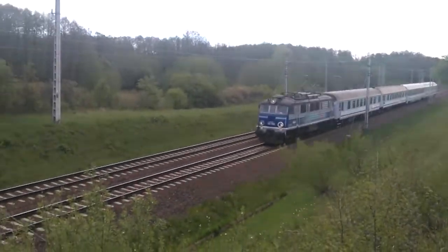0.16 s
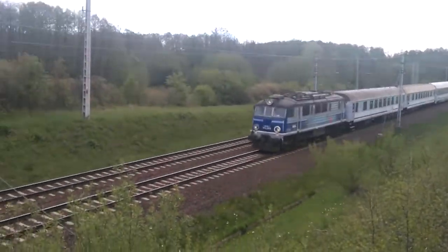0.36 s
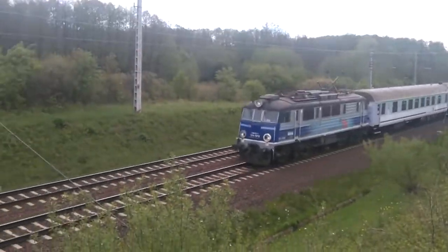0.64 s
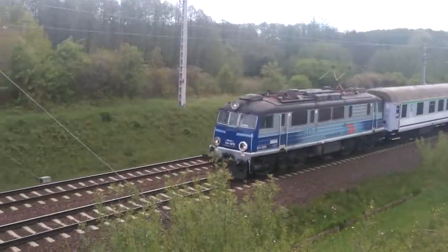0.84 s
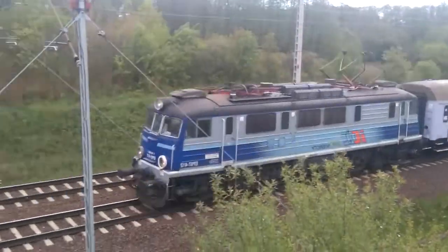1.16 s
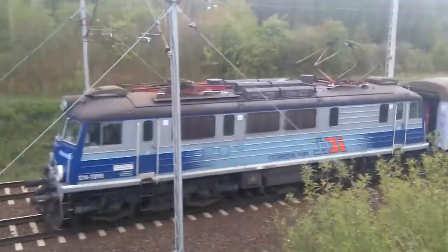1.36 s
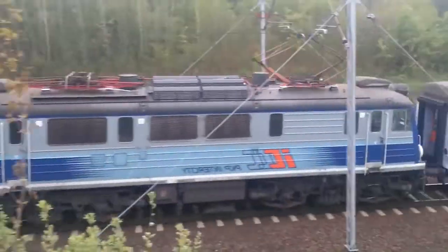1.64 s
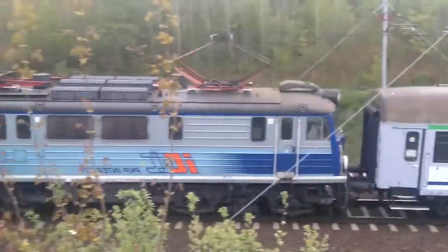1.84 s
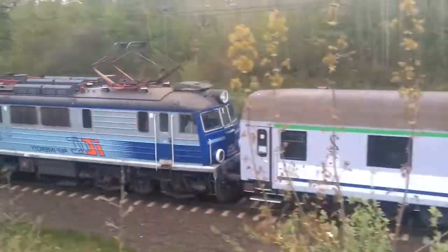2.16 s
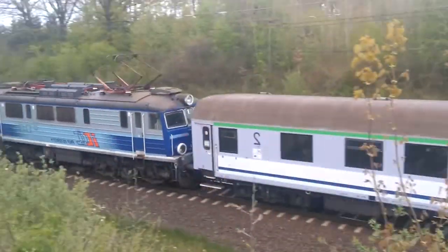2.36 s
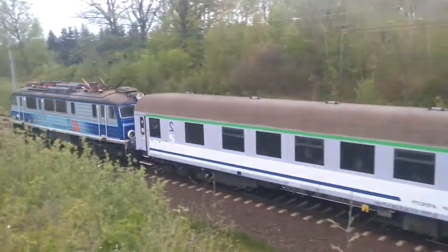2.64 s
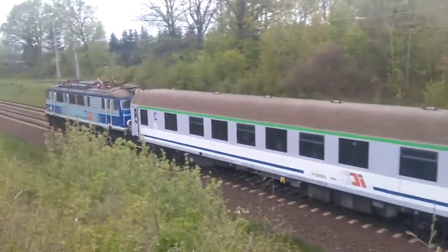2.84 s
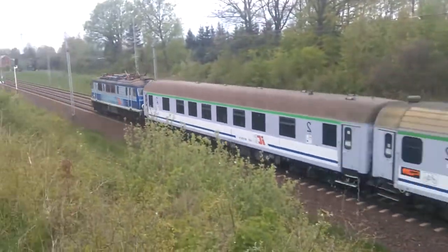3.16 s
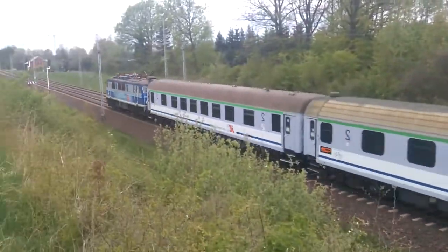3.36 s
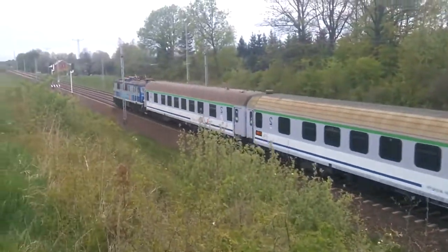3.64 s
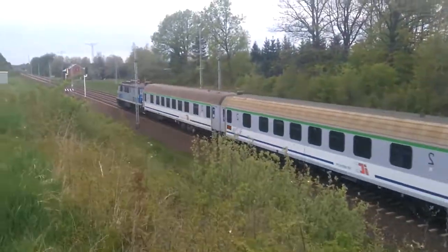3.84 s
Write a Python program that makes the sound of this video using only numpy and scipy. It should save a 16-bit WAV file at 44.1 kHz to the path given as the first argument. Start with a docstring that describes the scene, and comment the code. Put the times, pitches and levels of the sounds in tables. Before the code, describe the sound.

Electric locomotive and coaches roll past a few metres away with rushing, ringing wheel-on-rail roar.

```python
"""Electric train rolling past

An electric locomotive and its first coaches pass a few metres away. Rough wheels on rough rails shake both:
shaped noise, dull from ahead, broad beside the locomotive, then mixed with a sinking wheel ring over the coaches.
Gliding noise-fed resonances make wheels, rail, blowers, drone and gear moan; two flickering noise bands
make the hiss of wheels and air, low noise the ground rumble."""
import sys
import numpy as np
from scipy import signal
from scipy.fft import rfft, irfft, next_fast_len
from scipy.io import wavfile
from scipy.ndimage import uniform_filter1d, map_coordinates

SR = 44100
rng = np.random.default_rng(int(sys.argv[2]) if len(sys.argv) > 2 else 0)


def master(y):
    """Save y as 16-bit WAV."""
    cut = np.clip(np.atleast_2d(y).T, -1, 1)
    pcm = np.round(cut * 32767)  # scale
    wavfile.write(sys.argv[1], SR, pcm.astype(np.int16))


N = 176400


def amp(db):
    """Amplitude gain of a level in dB."""
    return 10 ** (np.asarray(db) / 20)


def unit(x):
    """Scale to rms 1."""
    return x / np.sqrt(np.mean(x ** 2) + 1e-20)


def curves(rows):
    """Interpolate each column after the time to one value per sample."""
    knots_s, *columns = np.transpose(rows)
    t = np.arange(N) / SR
    return [np.interp(t, knots_s, column) for column in columns]


def wobble(rate_hz):
    """Smooth random curve with rate_hz knots a second."""
    knots = rng.standard_normal(int(N * rate_hz / SR) + 4)
    return map_coordinates(knots, [np.arange(N) * rate_hz / SR])


def filtered(x, response):
    """Zero-phase filter: multiply the spectrum by response(Hz)."""
    m = next_fast_len(N + 8192)
    spectrum = rfft(x, m) * response(np.fft.rfftfreq(m, 1 / SR))
    return irfft(spectrum, m)[..., :N]


def rush(spectrum, patchy_db):
    """Coloured noise of rms 1; smoothed random gains in time and frequency make it patchy."""
    z = signal.stft(rng.standard_normal(N), nperseg=1024)[2]
    field = uniform_filter1d(rng.standard_normal(z.shape), size=5, axis=0)
    field = uniform_filter1d(field, size=5, axis=1)
    noise = signal.istft(z * amp(patchy_db * unit(field)), nperseg=1024)[1][:N]
    f, db = np.transpose(spectrum)
    # dB linear over log frequency
    return unit(filtered(noise, lambda hz: amp(np.interp(np.log(hz + 1), np.log(f + 1), db))))


def ringing(rows, width_hz):
    """Noise-driven resonance: slow noise modulates a gliding carrier; silent outside the table's times."""
    steady = 0.4  # 0 = flutters like noise, 1 = constant envelope
    hz, level_db = curves(rows)
    a, b = filtered(rng.standard_normal((2, N)), lambda f: 1 / (1 + (f / width_hz) ** 2))
    phase = 2 * np.pi * np.cumsum(hz) / SR
    envelope = np.hypot(a, b) + 1e-9
    wave = (a * np.cos(phase) + b * np.sin(phase)) / envelope ** steady
    t = np.arange(N) / SR
    active = (t >= rows[0][0]) & (t <= rows[-1][0])
    return amp(level_db) * active * unit(wave)


def rolling():
    """Wheel and rail roughness as broad noise: three views of the train crossfade and sway together."""
    # levels of the views: t/s, from ahead/dB, beside locomotive/dB, coaches/dB
    view_levels = [(0, -25.5, -43, -50), (.3, -22.5, -38, -48), (.6, -20.5, -31, -37),
                   (.75, -17.5, -29, -38), (.9, -17.5, -23, -33), (1.2, -21.5, -17, -26),
                   (1.5, -32.5, -16.5, -24), (1.8, -23.5, -17.5, -34), (2.1, -40, -16.5, -24),
                   (2.4, -45, -23, -17), (2.7, -53, -24, -15.5), (3, -50, -28, -16), (3.3, -52, -23, -17.5),
                   (3.6, -46, -27.5, -16), (4, -50, -23.5, -18.5)]
    # spectra of the views: f/Hz, density/dB per Hz
    ahead = [(53, -49), (90, -30), (139, -24.5), (302, -19.5), (325, -22.5), (487, -4.5), (574, -9.5),
             (628, -5), (899, -5.5), (983, -6), (1250, -6.5), (1450, -14.5), (1760, -16), (2240, -23.5),
             (3200, -28.5), (4160, -55), (7040, -120)]
    beside = [(53, -61), (90, -20.5), (214, -15), (260, -11.5), (395, -13.5), (549, -3), (774, -5),
              (872, -1), (1060, -4.5), (1290, -2.5), (1560, -10.5), (1760, -3.5), (2200, -11.5),
              (2450, -8.5), (3200, -23), (4160, -51), (7040, -120)]
    coaches = [(53, -58), (90, -33), (241, -26), (280, -25), (480, -8), (729, -9), (809, -5), (912, -10),
               (1060, -6), (1270, -21.5), (1520, -5), (1680, -2.5), (2240, -9.5), (3060, -28), (3200, -31),
               (4160, -48), (7040, -120)]
    sway_db, sway_rate_hz = 0.3, 6.26
    ahead_db, beside_db, coach_db = curves(view_levels)
    broad = amp(ahead_db) * rush(ahead, patchy_db=1.5)
    broad += amp(beside_db) * rush(beside, patchy_db=0.8)
    broad += amp(coach_db) * rush(coaches, patchy_db=1.3)
    return amp(sway_db * wobble(sway_rate_hz)) * broad


def wheels():
    """Wheel discs ring in three modes; a sharper line follows the centre of the main one."""
    # modes: t/s, centre f/Hz, level/dB
    main_mode = [(0, 1760, -36), (.5, 1775, -32), (1, 1789, -29.5), (1.4, 1778, -24.5), (1.8, 1756, -23.5),
                 (2.2, 1770, -21), (2.5, 1761, -21.5), (2.8, 1684, -20.5), (3.1, 1730, -23.5),
                 (3.4, 1680, -22), (3.7, 1660, -23.5), (4, 1644, -22)]
    upper_mode = [(.8, 2500, -50), (1.2, 2480, -50), (1.55, 2440, -23.5), (1.8, 2400, -44.5),
                  (2.1, 2340, -29), (2.4, 2360, -39), (2.8, 2300, -24.5), (3.1, 2240, -33),
                  (3.5, 2160, -35), (4, 2120, -34)]
    high_mode = [(2.9, 4800, -55), (3.3, 4760, -48), (3.55, 4700, -33.5), (3.75, 4750, -48), (4, 4680, -46)]  # second coach
    core_db = -5  # relative to main mode
    ring = ringing(main_mode, width_hz=160)
    ring += amp(core_db) * ringing(main_mode, width_hz=35)
    ring += ringing(upper_mode, width_hz=58)
    return ring + ringing(high_mode, width_hz=138)


def rail():
    """Rail resonance between sleepers, driven by noise."""
    # t/s, centre f/Hz, level/dB
    rail_mode = [(0, 850, -23.5), (.2, 840, -24.5), (.45, 850, -30), (.8, 850, -36), (1.1, 880, -26),
                 (1.5, 880, -24), (1.9, 860, -25), (2.3, 840, -22.5), (2.7, 800, -37), (3.1, 810, -34),
                 (3.5, 820, -31), (4, 830, -27)]
    return ringing(rail_mode, width_hz=77)


def hiss():
    """Treble of wheels and air: two noise bands whose levels flicker partly together."""
    # base levels: t/s, low treble/dB, high treble/dB
    treble_levels = [(0, -43.5, -46), (.3, -41.5, -43), (.6, -37.5, -39.5), (.83, -34, -38.5),
                     (.87, -31.5, -37), (1, -32.5, -37), (1.15, -29.5, -36.5), (1.3, -28.5, -36),
                     (1.55, -28.5, -35.5), (1.8, -27.5, -35.5), (1.88, -31.5, -39.5), (2.1, -26, -34),
                     (2.28, -29.5, -37.5), (2.5, -29.5, -38), (2.78, -28, -39), (2.86, -31.5, -41),
                     (3.2, -31, -41.5), (3.32, -29, -35), (3.4, -31, -39.5), (3.55, -31, -40),
                     (3.7, -32, -41), (4, -33.5, -39)]
    # band spectra: f/Hz, density/dB per Hz
    low_treble = [(1700, -46), (2800, -1), (3100, -2.5), (3500, 0.5), (4200, -1), (4700, -1), (5400, -1.5),
                  (5800, -6.5), (6200, -9.5), (8000, -40), (14000, -120)]
    high_treble = [(3600, -44), (5800, -8.5), (6500, -5), (6900, 0.5), (7500, -1), (8500, -2.5),
                   (9000, -7.5), (9500, -10), (10200, -9.5), (11000, -16), (12000, -17.5), (13400, -30),
                   (14250, -28)]
    slow_db, quick_db, own_db = 0.02, 0.68, 1  # flicker depths: shared, shared, each band alone
    low_db, high_db = curves(treble_levels)
    shared_db = slow_db * wobble(14) + quick_db * wobble(35.04)
    low_db = low_db + shared_db + own_db * wobble(21.88)
    high_db = high_db + shared_db + own_db * wobble(22.02)
    low = amp(low_db) * rush(low_treble, patchy_db=2.0)
    high = amp(high_db) * rush(high_treble, patchy_db=3.0)
    return low + high


def ground_rumble():
    """Low-frequency noise through track bed and air."""
    # t/s, level/dB
    ground_level = [(0, -49.5), (.35, -51), (.6, -42), (.75, -44.5), (1, -42), (1.3, -41), (1.5, -49),
                    (1.75, -44), (2.1, -45), (2.4, -47.5), (2.8, -47), (3.2, -47.5), (3.6, -47), (4, -45)]
    # f/Hz, density/dB per Hz
    ground_spectrum = [(11, -41), (18, -16), (64, 1), (110, -3), (140, -36), (240, -120)]
    level_db, = curves(ground_level)
    return amp(level_db) * rush(ground_spectrum, patchy_db=-0.5)


def blowers():
    """Howl of the motor blowers: a gliding noise-fed resonance."""
    # t/s, centre f/Hz, level/dB
    howl = [(.2, 1253, -40), (.55, 1250, -32), (.8, 1210, -27.5), (1, 1200, -36), (1.2, 1191, -27.5),
            (1.5, 1178, -36), (2.2, 1152, -29.5), (2.6, 1117, -38)]
    return ringing(howl, width_hz=66)


def drone():
    """Low locomotive drone: a very narrow gliding resonance."""
    # t/s, centre f/Hz, level/dB
    drone_track = [(.45, 74.2, -60), (.6, 74, -47), (.8, 71.7, -46), (1.05, 65.9, -48), (1.35, 72.2, -47),
                   (1.75, 72.3, -54), (2.1, 61.6, -52), (2.4, 60, -60)]
    return ringing(drone_track, width_hz=4)


def traction_gear():
    """Moan of the traction gear: a narrow gliding resonance."""
    # t/s, centre f/Hz, level/dB
    moan = [(.6, 300.5, -53), (1, 289.3, -43), (1.3, 262.3, -36), (1.7, 263.2, -46), (2.2, 271, -42.5),
            (2.6, 259.1, -58)]
    return ringing(moan, width_hz=13)


def scene():
    """Sum all sources at one microphone."""
    train = rolling() + wheels() + rail() + hiss() + ground_rumble()
    locomotive = blowers() + drone() + traction_gear()
    return (train + locomotive)[None]


def record(dry):
    """Microphone amplifier rounds off peaks; a steep low-pass then limits the band."""
    ceiling, knee = 1.0, 2.2  # full scale = 1; higher knee bends more abruptly
    top_hz = 14290
    bent = dry / (1 + np.abs(dry / ceiling) ** knee) ** (1 / knee)
    return filtered(bent, lambda hz: hz < top_hz)


dry = scene()
out = record(dry)
master(out)
```